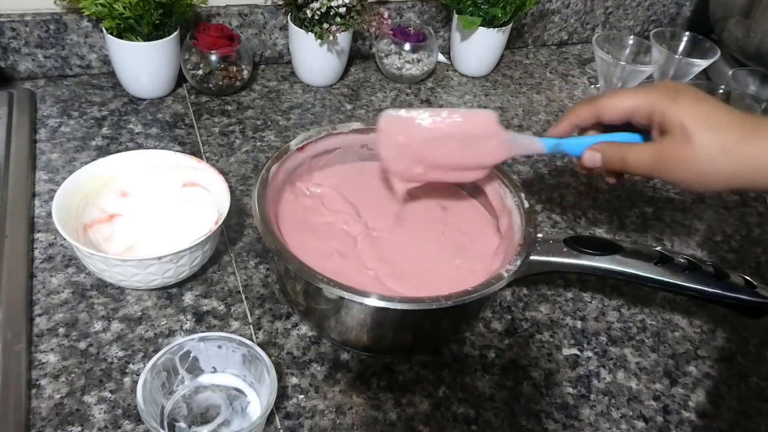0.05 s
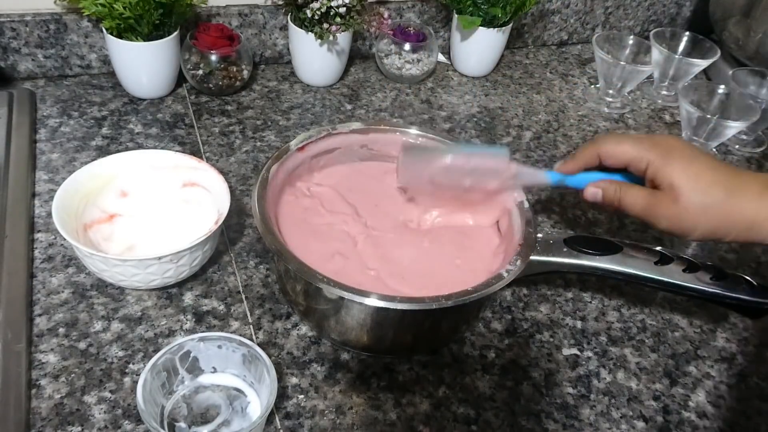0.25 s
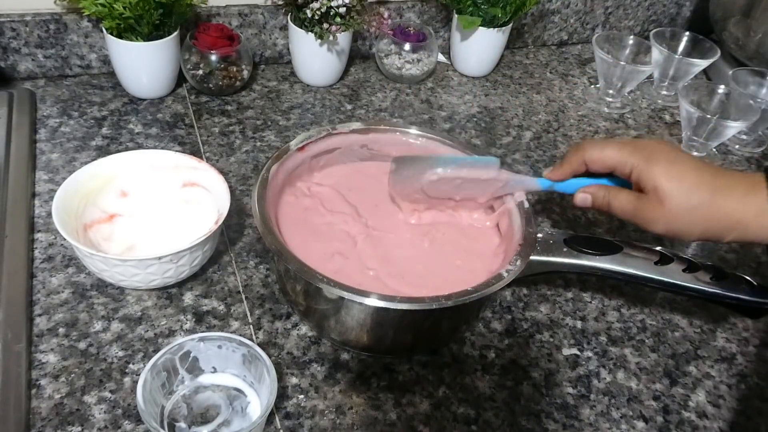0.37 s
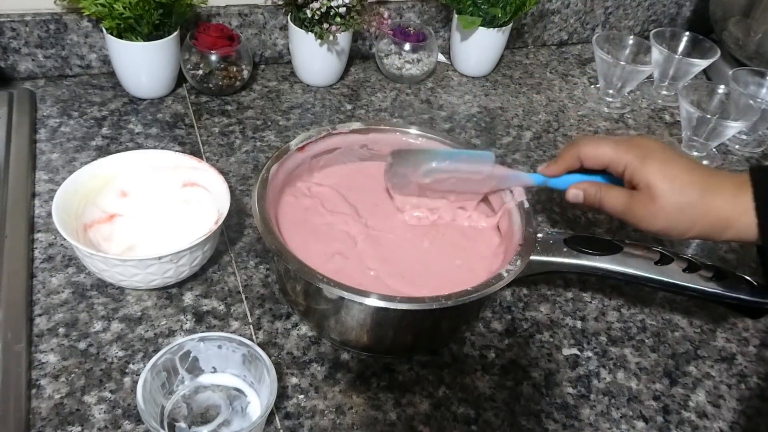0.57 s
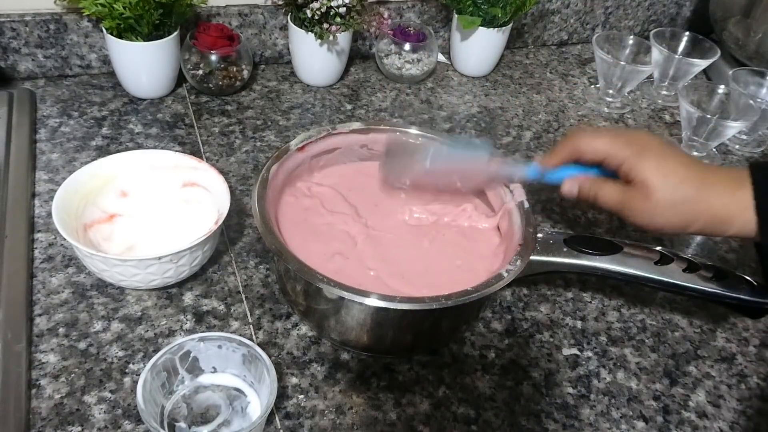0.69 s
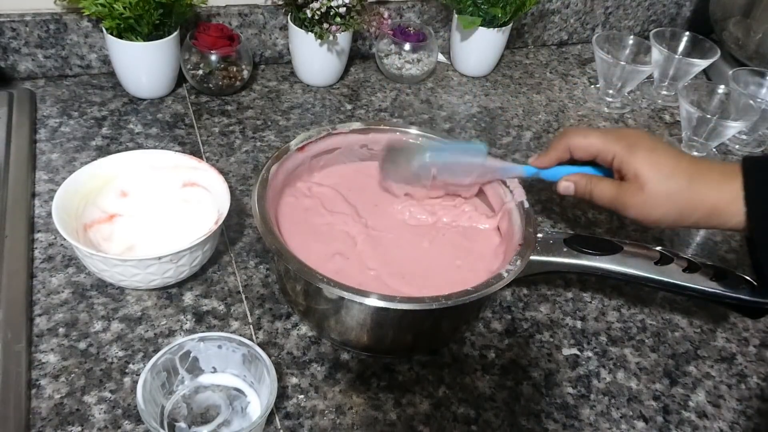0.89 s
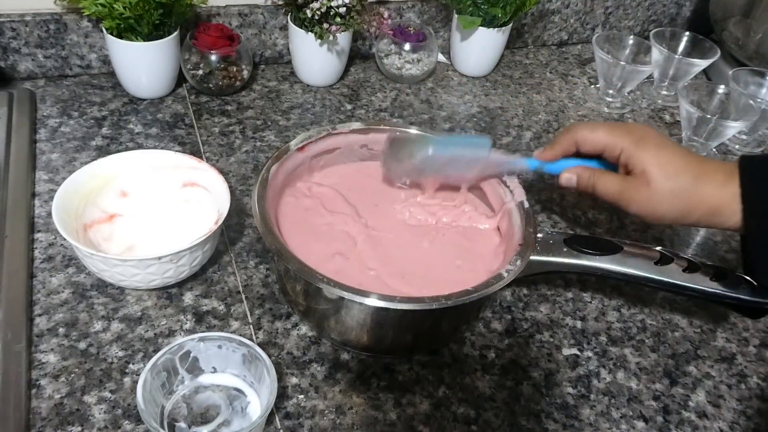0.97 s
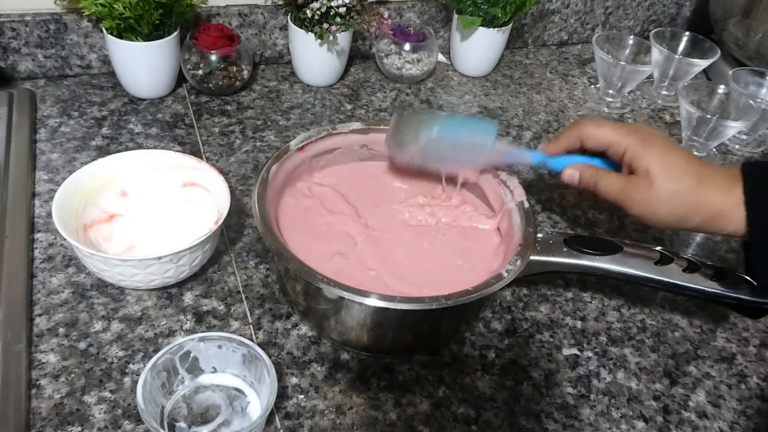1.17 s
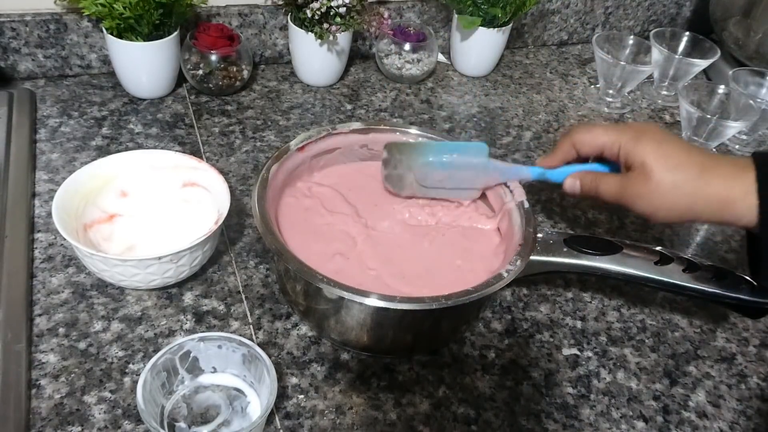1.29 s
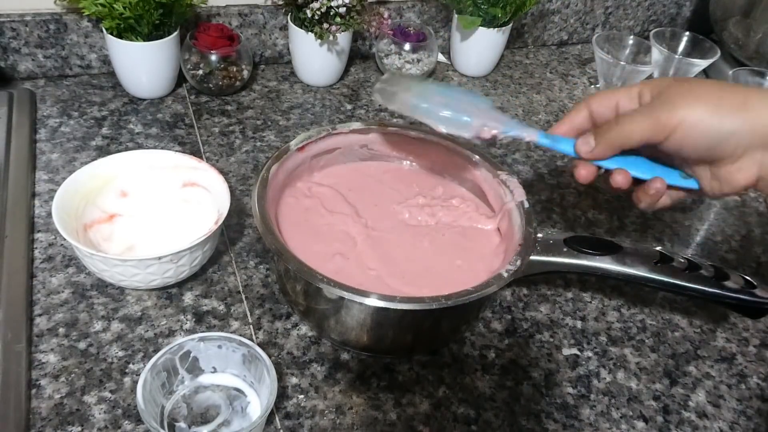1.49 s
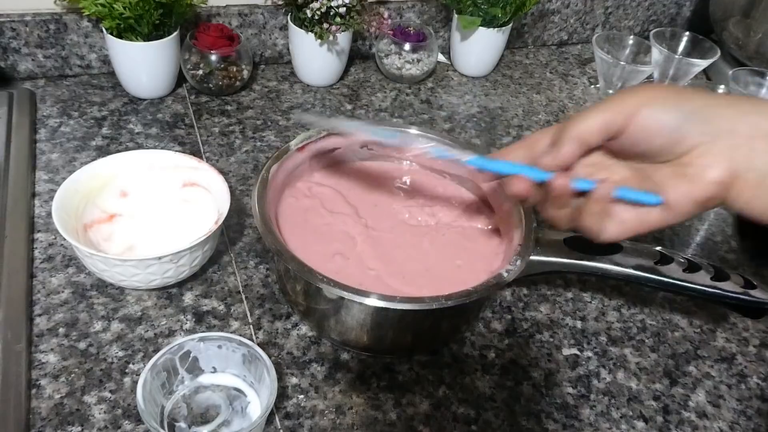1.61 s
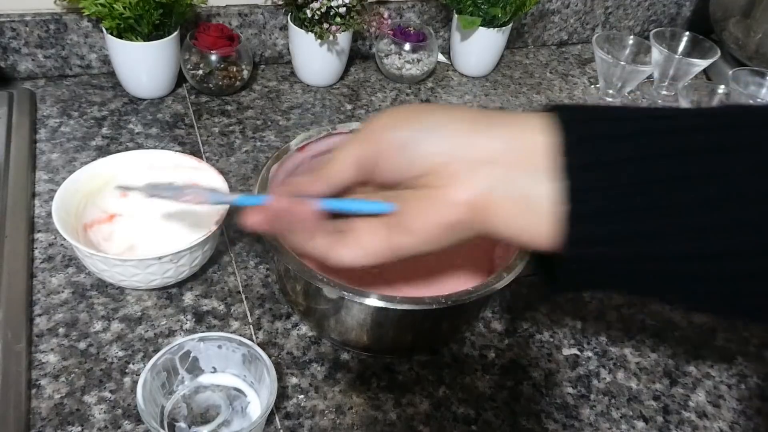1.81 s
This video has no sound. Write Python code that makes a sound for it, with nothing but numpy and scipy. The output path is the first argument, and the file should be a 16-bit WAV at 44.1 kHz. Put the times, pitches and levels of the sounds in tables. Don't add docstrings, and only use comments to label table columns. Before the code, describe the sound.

Plastic spatula knocked seven times on a steel saucepan rim, sharp damped clanks in a tiled kitchen

```python
import sys
import numpy as np
from scipy import signal
from scipy.io import wavfile
from scipy.ndimage import uniform_filter1d, minimum_filter1d

SR = 44100
rng = np.random.default_rng(int(sys.argv[2]) if len(sys.argv) > 2 else 0)


def nominal_scale(level):
    x = np.asarray(level, float) / 20
    return 10 ** x


def store_pcm(level_fs):
    pcm = np.round(np.clip(level_fs, -1, 1) * 32767).astype(np.int16)
    wavfile.write(sys.argv[1], SR, np.atleast_2d(pcm).T)


N = 81585

# f/Hz, density/dB per Hz
AIR_COLOUR = [(25, -63), (60, -41), (130, -12), (250, -0.5), (600, -4), (1500, -22), (6000, -39.5),
              (15000, -49)]
# f/Hz, density/dB per Hz
HISS_COLOUR = [(25, -18), (90, 0), (250, -8), (700, -0.5), (2000, -6), (6000, -14.5), (9000, -20),
               (15000, -26)]
# f/Hz, likeness/0-1
AIR_LIKENESS = [(30, 0.27), (80, 0.15), (240, 0.48), (950, 0.27), (3770, 0.45), (15000, 0.51)]
# f/Hz, left level/dB, right level/dB
HUM_LINES = [(100, -66, -66), (300, -42.5, -44.5)]
# delay/s, level/dB
ECHOES = [(.0008, -26.5), (.0033, -19.5), (.0045, -24), (.0064, -16), (.0105, -19)]
# f/Hz, t60/s
ROOM_DECAY = [(200, 1), (530, 0.29), (1390, 0.48), (3680, 0.47), (9700, 0.39), (15000, 0.24)]
# f/Hz, level/dB
ROOM_COLOUR = [(200, 8.5), (600, 8), (1500, 7.5), (3000, 0.5), (6000, -3), (9000, -3), (14000, -18)]
# f/Hz, likeness/0-1
ROOM_LIKENESS = [(40, .2), (200, .8), (1000, .8), (3000, .8), (6000, .85), (12000, .5)]
# f/Hz, level/dB, t60/s
BODY_MODES = [(183.6, -31.5, 0.063), (248, -29.5, 0.051), (353.4, -28.5, 0.069), (551, -25, 0.037),
              (742.5, -19.5, 0.056), (948, -14, 0.043), (1146, -14, 0.025), (1454, -7, 0.014),
              (1740, -9, 0.013)]
# f/Hz, level/dB, t60/s
WALL_MODES = [(2412, -9.5, 0.035), (2604, -13.5, 0.042), (2799, -2, 0.019), (3088, -16, 0.06),
              (3220, -16.5, 0.042), (3407, -2.5, 0.0051)]
# f/Hz, level with blow near/dB, level with blow shifted/dB, t60/s
RIM_MODES = [(3980, -8.5, 4.5, 0.0056), (4280, -5.5, 3.5, 0.0056), (4655, -2.5, 5.5, 0.0049),
             (5143, -16, -10, 0.017), (5366, -8.5, 7, 0.0095), (5700, 5, 1.5, 0.0045), (5966, 3, 5, 0.005),
             (6235, 1, -7.5, 0.013), (6900, -32, -24, 0.023), (7394, -18.5, -17, 0.033),
             (8230, -17.5, -2.5, 0.0063), (8790, -8.5, -10, 0.0064), (10230, -24, -10, 0.0083),
             (14200, -44, -21, 0.0051)]
# t/s, blow level/dB, body level/dB, wall level/dB, shift of blow along rim/0-1
KNOCKS = [
    (0.2365, -3, 6, -0.5, 1.),
    (0.4138, -1.5, 4, 0, 0.63),
    (0.5903, 1, -1, -3.5, 0.38),
    (.7667, -0.5, -0.5, -3, 0.15),
    (0.951, 0, -0.5, -2.5, 0.23),
    (1.1342, -1.5, 3, 0, 0),
    (1.3185, 0, 0.5, -2, 0.18),
]

AIR_DB, HISS_DB, FLOOR_EDGE_HZ, PATCH_DB = -44.5, -54.5, 15400, 1.4
HUM_WAVER_DB = 0.7
SWISH_DB, SWISH_S, SWISH_HZ, SWISH_HALF_WIDTH_HZ = -60, 0.12, 5300, 900
ROOM_DB, ROOM_START_S, PORT_LAG_S = -3, 0.002, 0.00007
BODY_TURN_RAD, WALL_TURN_RAD, RIM_TURN_RAD = 2.583, 1.25, 0.18
BODY_RISE_S, WALL_RISE_S, RIM_RISE_S = 0.002, 0.00072, 0.0003
SCATTER_DB, DETUNE, SLIP_RAD = 1.2, 0.003, 0.35
SIDEWAYS_T60 = 0.4
CRACK_DB, CRACK_HZ, CRACK_TOP_HZ, CRACK_S = -13.5, 1610, 10600, 0.0005
TICK_DB, TICK_HZ = 8.5, 500
MIC_LOW_HZ, EDGE_HZ, CEILING = 45, 15600, 1.1
DUCK_FROM_DB, HOLD_S = -22, 0.33
DUCK_DB, RECOVER_DB_PER_S = 5, 3
HISS_DUCK_DB, HISS_RECOVER_DB_PER_S = 3.5, 18


def evened(x):
    return x / np.sqrt(np.mean(x ** 2) + 1e-20)


def read(points, hz):
    f, value = np.transpose(points)
    return np.interp(np.log(hz + 1), np.log(f + 1), value)


def add(mix, s, sound):
    part = mix[round(s * SR):][:len(sound)]
    part += sound[:len(part)]


def pair(z, likeness):
    same = np.clip(likeness, 0, 1)[:, None]
    return np.array([z[0], same * z[0] + np.sqrt(1 - same ** 2) * z[1]])


def air(colour, level_db):
    frames, hz = N // 256 + 5, np.fft.rfftfreq(1024, 1 / SR)
    a, b, c, d, patches = rng.standard_normal((frames, 513, 5)).T
    patches = uniform_filter1d(patches, 12, 0)
    patches = evened(uniform_filter1d(patches, 14, 1))
    z = pair(np.array([a + 1j * b, c + 1j * d]), read(AIR_LIKENESS, hz))
    z = z * nominal_scale(read(colour, hz)[:, None] + PATCH_DB * patches)
    z *= (hz < FLOOR_EDGE_HZ)[:, None]
    noise = signal.istft(z, nperseg=1024, noverlap=768)[1][:, :N]
    return nominal_scale(level_db) * evened(noise)


def hum():
    t, out = np.arange(N) / SR, np.zeros((2, N))
    for hz, left_db, right_db in HUM_LINES:
        drift = uniform_filter1d(rng.standard_normal(N), 3000)
        waver = evened(uniform_filter1d(drift, 3000))
        for k, db in enumerate((left_db, right_db)):
            level = np.sqrt(2) * nominal_scale(db + HUM_WAVER_DB * waver)
            out[k] += level * np.sin(2 * np.pi * hz * t + 0.25 * k)
    return out


def swish():
    t = np.arange(N) / SR
    edges_hz = [SWISH_HZ - SWISH_HALF_WIDTH_HZ, SWISH_HZ + SWISH_HALF_WIDTH_HZ]
    band = signal.butter(1, edges_hz, "band", fs=SR)
    noise = rng.standard_normal(N) + 0.5 * rng.standard_normal((2, N))
    hiss = signal.lfilter(*band, noise)
    return nominal_scale(SWISH_DB) * evened(hiss) * np.exp(-(t / SWISH_S) ** 2)


def room_tail(shared):
    size = shared.shape[1]
    start = 1 - np.exp(-(np.arange(size) / SR / ROOM_START_S) ** 2)
    own = 0.6 * rng.standard_normal((2, size))
    hz, t, z = signal.stft(shared + own, SR, nperseg=256)
    z = pair(z, read(ROOM_LIKENESS, hz)) * nominal_scale(-60 * t / read(ROOM_DECAY, hz)[:, None])
    level = np.linalg.norm(signal.istft(z, SR, nperseg=256)[1][0])
    coloured = z * nominal_scale(read(ROOM_COLOUR, hz))[:, None]
    tail = signal.istft(coloured, SR, nperseg=256)[1][:, :size] * start
    return nominal_scale(ROOM_DB) / level * tail


def kitchen(front, side, tick):
    out = np.array([front, front])
    for k, (s, db) in enumerate(ECHOES):
        sign = (-1) ** k
        add(out[0], s, sign * nominal_scale(db) * front)
        add(out[1], s + sign * PORT_LAG_S, sign * nominal_scale(db) * front)
    starts_s = [row[0] - 0.005 for row in KNOCKS]
    turn = np.searchsorted(starts_s, np.arange(N) / SR) % 3
    for feed in (side, tick):
        shared = rng.standard_normal((2, SR // 2))
        for k in range(3):
            struck = (feed * (turn == k))[None]
            out += signal.fftconvolve(struck, room_tail(shared), axes=1)[:, :N]
    return out


def ring(hz, db, t60, rise_s, turn_rad, luck):
    t = np.arange(6000)[:, None] / SR
    luck, order = luck[:, :len(hz)], np.arange(len(hz))
    phase = 2 * np.pi * hz * (1 + DETUNE * luck[1]) * t + SLIP_RAD * luck[2]
    db = db + SCATTER_DB * luck[0]
    front = nominal_scale(db - 60 * t / t60) * np.sin(phase - turn_rad * order)
    side = nominal_scale(db - 60 * t / t60 / SIDEWAYS_T60) * np.sin(phase - np.pi * order)
    side = side / np.sqrt(SIDEWAYS_T60)
    rise = 1 - np.exp(-(t / rise_s) ** 2)
    return np.array([front.sum(1), side.sum(1)]).T * rise


def knocks():
    out, t = np.zeros((N, 3)), np.arange(900) / SR
    luck = rng.standard_normal((len(KNOCKS), 9, 16))
    grit = rng.standard_normal((len(KNOCKS), 900))
    body, wall = np.transpose(BODY_MODES), np.transpose(WALL_MODES)
    rim_hz, near_db, shifted_db, rim_t60 = np.transpose(RIM_MODES)
    crack_band = signal.butter(1, [CRACK_HZ, CRACK_TOP_HZ], "band", fs=SR)
    tick_band = signal.butter(1, [TICK_HZ, CRACK_TOP_HZ], "band", fs=SR)
    crack_shape = t / CRACK_S * np.exp(1 - t / CRACK_S)
    tick = signal.lfilter(*tick_band, t == 0)
    for (s, db, body_db, wall_db, shift), u, g in zip(KNOCKS, luck, grit):
        rim_db = near_db + np.clip(shift, 0, 1) * (shifted_db - near_db)
        rim_ring = ring(rim_hz, rim_db, rim_t60, RIM_RISE_S, RIM_TURN_RAD, u[:3])
        wall_ring = ring(*wall, WALL_RISE_S, WALL_TURN_RAD, u[3:6])
        body_ring = ring(*body, BODY_RISE_S, BODY_TURN_RAD, u[6:])
        crack = signal.lfilter(*crack_band, g) * crack_shape
        add(out[:, :2], s, nominal_scale(db) * rim_ring)
        add(out[:, :2], s, nominal_scale(db + wall_db) * wall_ring)
        add(out[:, :2], s, nominal_scale(db + body_db) * body_ring)
        add(out[:, 0], s, nominal_scale(db + CRACK_DB) * crack)
        add(out[:, 2], s, nominal_scale(db + TICK_DB) * tick)
    return signal.lfilter(*signal.butter(1, MIC_LOW_HZ, "high", fs=SR), out.T)


def scene():
    return air(AIR_COLOUR, AIR_DB) + hum() + swish() + kitchen(*knocks())


def duck(loud, depth_db, recover_db_per_s):
    fall_db = np.arange(N) * recover_db_per_s / SR
    down_db = np.maximum.accumulate(depth_db * loud + fall_db) - fall_db
    return nominal_scale(-uniform_filter1d(np.maximum(down_db, 0), 100))


def top_cut(x):
    return signal.sosfilt(signal.butter(12, 16860, fs=SR, output="sos"), x)


def record(dry):
    power = uniform_filter1d((dry ** 2).mean(0), 200)
    power_db = 10 * np.log10(abs(power) + 1e-12)
    hold = round(HOLD_S * SR)
    held_db = -minimum_filter1d(-power_db, hold + 1, origin=hold // 2, mode="nearest")
    loud = held_db > DUCK_FROM_DB
    ducked = dry * duck(loud, DUCK_DB, RECOVER_DB_PER_S)
    ducked += air(HISS_COLOUR, HISS_DB) * duck(loud, HISS_DUCK_DB, HISS_RECOVER_DB_PER_S)
    edge = signal.firwin(63, EDGE_HZ, window=("kaiser", 9), fs=SR)
    limited = signal.oaconvolve(CEILING * np.tanh(ducked / CEILING), edge[None], "same")
    return top_cut(limited)


dry = scene()
out = record(dry)
store_pcm(out)
```